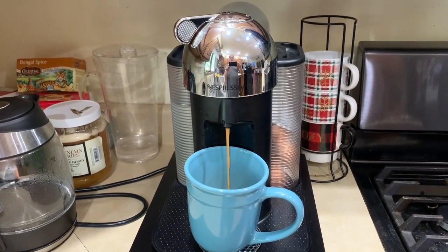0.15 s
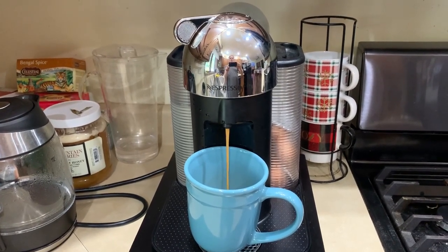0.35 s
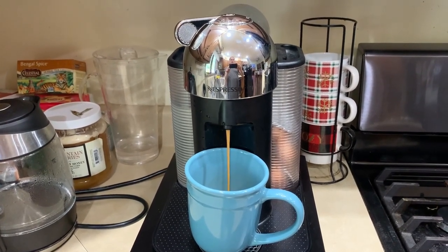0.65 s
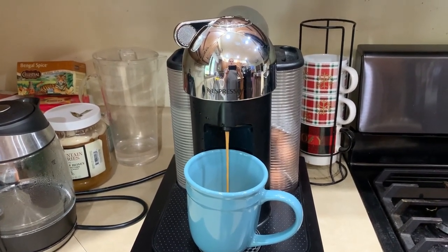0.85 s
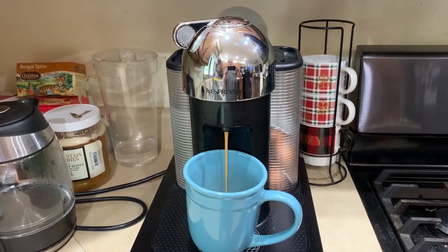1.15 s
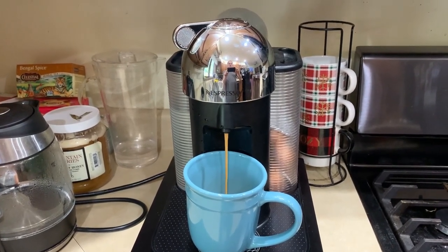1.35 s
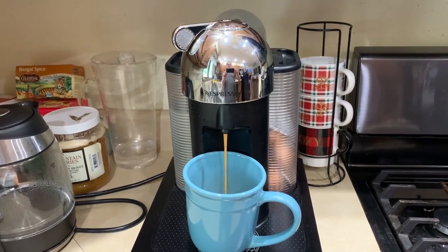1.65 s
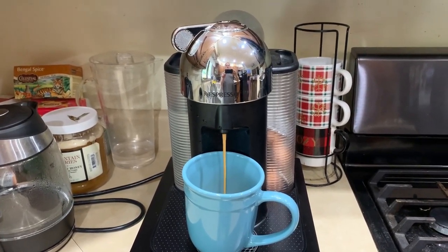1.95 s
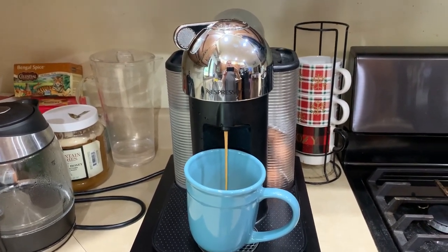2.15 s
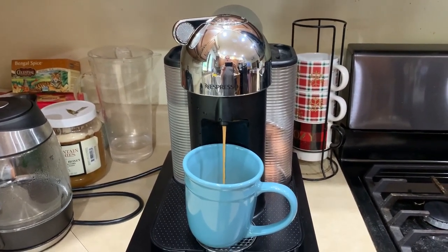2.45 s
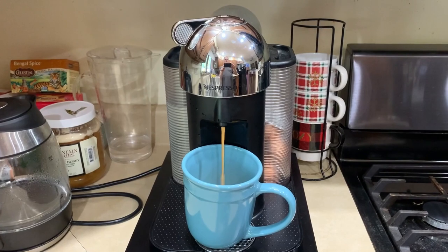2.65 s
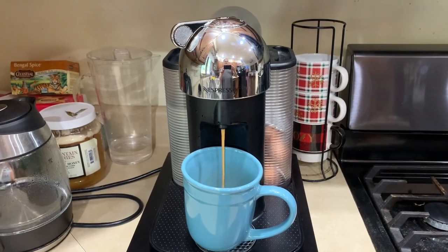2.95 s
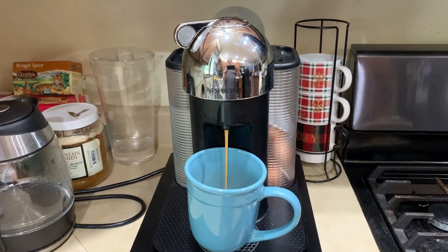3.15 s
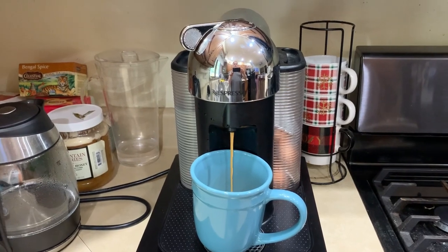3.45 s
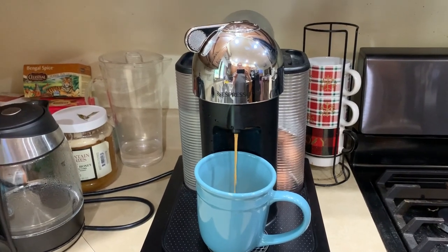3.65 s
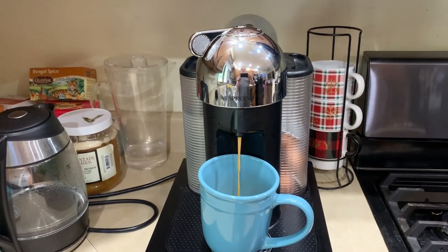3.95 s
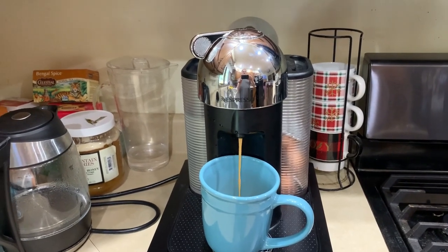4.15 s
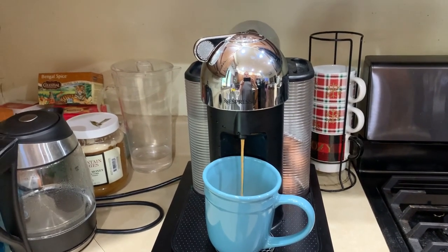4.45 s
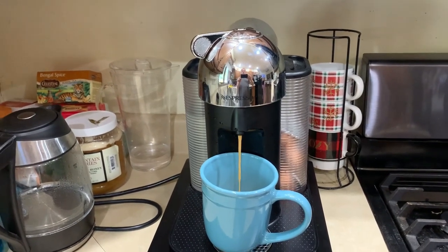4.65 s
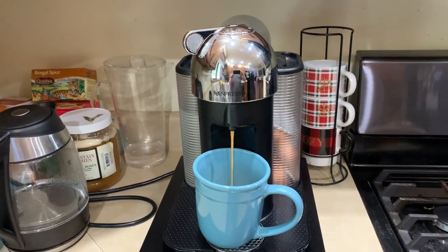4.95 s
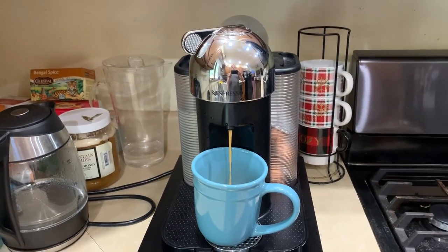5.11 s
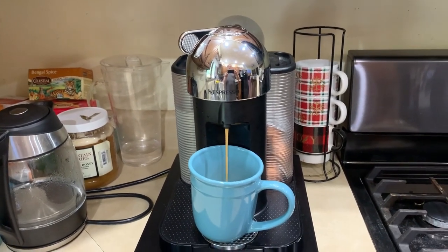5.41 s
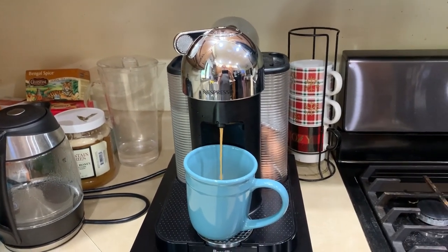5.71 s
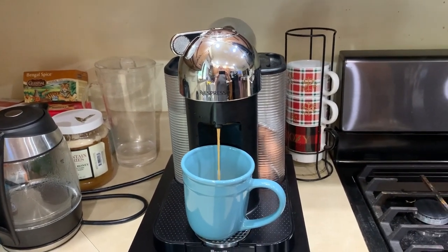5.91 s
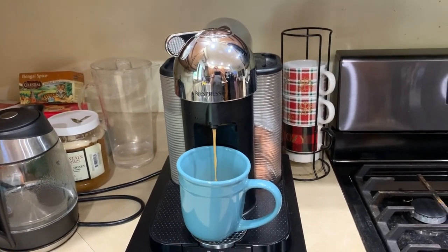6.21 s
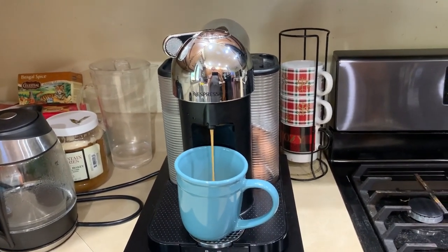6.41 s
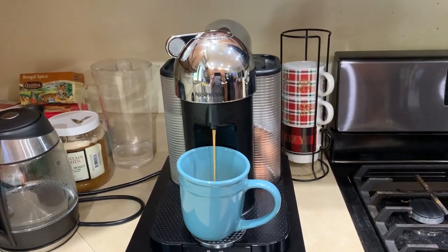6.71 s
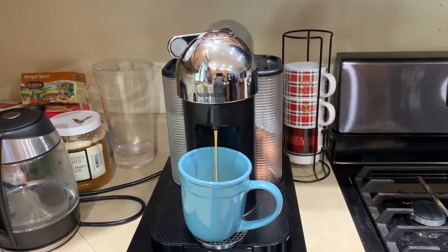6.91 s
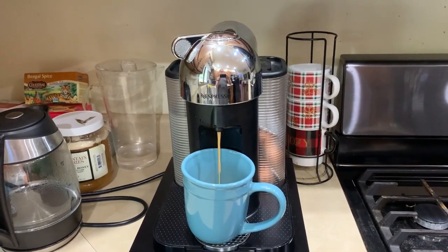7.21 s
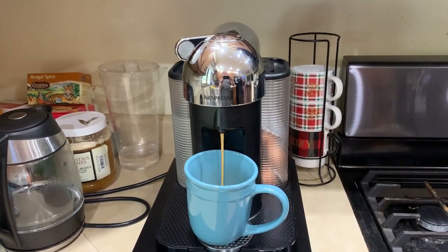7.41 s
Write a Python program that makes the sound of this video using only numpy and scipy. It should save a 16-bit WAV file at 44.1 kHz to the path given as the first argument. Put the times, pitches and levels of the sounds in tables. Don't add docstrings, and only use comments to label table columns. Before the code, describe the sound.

A capsule coffee machine runs throughout on a kitchen counter. A low mains hum from the pump beats slightly against a spinning drone, over rumbling bearings and a bright airy hiss. Small dull knocks, thin rattles and tiny bright cracks come irregularly, several per second, one knock clearly louder every couple of seconds. Heard in stereo by a phone about half a metre away, with short reflections off counter and wall.

```python
import sys
import numpy as np
from scipy import signal
from scipy.fft import rfft, irfft, next_fast_len
from scipy.io import wavfile

SR = 44100
rng = np.random.default_rng(int(sys.argv[2]) if len(sys.argv) > 2 else 0)


def ratio_of_db(decibels):
    return 10 ** (np.asarray(decibels, float) / 20)


def dump_mix(stems):
    frames = np.atleast_2d(stems).T
    limited = np.clip(frames, -1, 1)
    pcm = np.round(limited * 32767).astype(np.int16)
    wavfile.write(sys.argv[1], SR, pcm)


N = 333837

LOOP = 82320
T = np.arange(LOOP) / SR
HZ = np.fft.rfftfreq(LOOP, 1 / SR)
SIDES = np.array([[.5], [-.5]])
MAINS_HZ, SHAFT_HZ = 60, 62.42

# multiple, level_db
COIL_LINES = [(1, -63), (2, -48), (3, -66), (4, -58), (5, -50), (6, -50), (7, -66), (8, -57), (9, -58),
              (10, -64), (11, -61), (15, -67), (18, -66), (25, -72)]
# multiple, level_db
SHAFT_LINES = [(2, -63), (3, -64), (5, -63), (6, -58), (9, -64), (10, -59), (11, -62), (12, -66), (13, -59),
               (14, -65), (16, -62), (17, -69), (24, -69)]
# time_s, level_db
RUBBING = [
    (1.867, -62.5),
    (2.053, -64.5),
    (2.287, -66.5),
    (2.723, -69),
    (2.963, -64),
    (3.343, -71.5),
    (3.733, -62.5),
]
# frequency_hz, level_db_per_hz
RUMBLE_DENSITY = [(30, -91), (48, -82), (250, -78.5), (480, -83), (1000, -82.5), (1400, -88.5),
                  (3500, -86.5), (6500, -89)]
# frequency_hz, left_minus_right_db
RUMBLE_BALANCE = [(200, -5), (2000, -0.5), (4400, -2.5), (6000, -9.5), (7000, 11.5)]
# frequency_hz, left_lead_rad
RUMBLE_PHASE = [(300, 0.57), (1500, 1), (2600, 1.76), (3600, 1.35), (5000, 2.26), (6200, 2.5)]
# frequency_hz, share common to both ports (0-1)
COHERENCE = [(30, .92), (130, .97), (300, .88), (700, .62), (1400, .55), (2600, .4), (4000, .35),
             (6500, .25)]
# frequency_hz, level_db_per_hz
HISS_DENSITY = [(6500, -85.5), (7500, -84), (8500, -80), (9500, -83.5), (11500, -89.5), (12500, -89.5),
                (13500, -94.5), (15600, -95.5)]
# frequency_hz, width_hz, gain_db
MACHINE_MODES = [(337, 170, 5.5), (838, 25, 9), (1050, 22, 1), (1933, 103, 8), (2356, 7.1, 17),
                 (2692, 112, 8.5), (3250, 1470, -3), (3770, 70, 9.5), (4090, 53, 9), (4460, 140, 7.5),
                 (4705, 27, 4.5), (4920, 52, 4), (5260, 19, 9),
                 (5640, 24, 3.6), (5860, 74, 2.3), (7020, 140, 9.4), (7900, 200, 4.8), (9760, 100, 6.1),
              (10180, 250, 4.6), (11200, 260, 3.45), (12850, 150, 5), (13500, 250, 6)]
# frequency_hz, level_db, t60_s
SHELL_MODES = [(675, -6.5, 0.06), (834, -3, 0.04), (925, -1, 0.012), (1072, 6, 0.0094),
               (1232, -7.5, 0.0079), (1580, -2.5, 0.016)]
# frequency_hz, level_db, t60_s
LOOSE_PART_MODES = [(1950, -5.5, 0.023), (2617, -4.5, 0.041), (3327, -4.5, 0.026), (3600, -3.5, 0.024),
                    (4720, 1.5, 0.008), (5250, -8, 0.014)]
# start_s, level_db, pitch_hz
KNOCK_EVENTS = [(2.0865, -31, 818), (2.1565, -30.5, 770), (2.1838, -26.5, 830), (2.2243, -27, 910),
                (2.2515, -36, 675), (2.4165, -32.5, 950), (2.4825, -32, 830), (2.514, -29, 1150),
                (2.543, -32, 950), (2.628, -30, 760), (2.7533, -19, 1000), (2.831, -38, 750),
                (2.898, -32, 860), (3.0002, -26, 810), (3.0485, -31, 840), (3.151, -42.5, 670),
                (3.265, -34.5, 715), (3.616, -37, 810), (3.661, -33, 690), (3.697, -37, 806)]
# start_s, rattle_level_db, pitch_hz, crack_level_db
RATTLE_EVENTS = [(2.033, -40.5, 3380, -53), (2.183, -43, 2700, -34), (2.354, -44, 2700, -52),
                 (2.483, -42, 3600, -50), (2.5144, -30.5, 2000, -26.5), (2.5417, -36.5, 4020, -24),
                 (2.629, -41.5, 3300, -39), (2.7523, -33.5, 2860, -29), (3.0005, -31, 2720, -48),
                 (3.036, -36, 2960, -35), (3.395, -40.5, 4500, -46)]


def curve(table):
    hz, value = np.transpose(table)
    return np.interp(np.log(HZ + 1), np.log(hz), value)


def noise(db, channels=1):
    white = rfft(rng.standard_normal((channels, LOOP)))
    return white * ratio_of_db(db) * np.sqrt(SR / 2)


def walk(rate_hz):
    x = irfft(noise(0)[0] * np.exp(-(HZ / rate_hz) ** 2) * (HZ > 0), LOOP)
    return x / x.std()


def flicker(spectrum, shared_db, own_db, rate_hz):
    octave = np.round(np.log2(HZ + 1))
    swell = walk(0.7)
    out = 0
    for k in range(4, 15):
        band = irfft(spectrum * (octave == k), LOOP)
        out = out + band * ratio_of_db(shared_db * swell + own_db * walk(rate_hz))
    return out


def resonance_db():
    return sum(db / (1 + (2 * (HZ - hz) / width) ** 2) for hz, width, db in MACHINE_MODES)


def kitchen(wet_db, t60, channels):
    echoes = rng.standard_normal((channels, LOOP)) * np.exp(-np.log(1000) * T / t60)
    energy = np.sum(echoes ** 2, axis=1, keepdims=True)
    echoes = rfft(echoes / np.sqrt(energy)) * np.minimum(HZ / 900, 1)
    return (1 + ratio_of_db(wet_db) * echoes) / np.sqrt(1 + ratio_of_db(2 * wet_db))


def head_delay():
    lag_s, turn_rad = .000196, 1.02
    phase = 2 * np.pi * HZ * lag_s - turn_rad
    return np.exp(-1j * SIDES * phase)


def housing_lead():
    return np.exp(1j * SIDES * curve(RUMBLE_PHASE))


def rumble():
    db = curve(RUMBLE_DENSITY + [(8500, -110)]) + resonance_db() - 0.5
    share = np.clip(curve(COHERENCE), 0, 1)
    common = np.sqrt(share) * noise(db) * housing_lead()
    separate = np.sqrt(1 - share) * noise(db, channels=2)
    balance = ratio_of_db(curve(RUMBLE_BALANCE) * SIDES)
    both = (common + separate) * balance * kitchen(-11, t60=0.12, channels=1)
    return flicker(both, shared_db=0.1, own_db=0.8, rate_hz=24.0)


def ring(modes, cycles):
    t = T[:4096]
    rings = []
    for k, (hz, db, t60) in enumerate(modes):
        tone = (-1) ** k * ratio_of_db(db) * np.sin(2 * np.pi * hz * t)
        decay = np.exp(-np.log(1000) * t / t60)
        onset = 1 - np.exp(-(t * hz / cycles) ** 2)
        rings.append(rfft(tone * decay * onset, LOOP))
    return rings


def blow(start_s, db, pan_db):
    return ratio_of_db(db + pan_db * SIDES) * np.exp(-2j * np.pi * HZ * (start_s % (LOOP / SR)))


def strike(start_s, db, pitch_hz, pan_db, modes, rings, focus_db):
    body = 0
    for (hz, _, _), mode in zip(modes, rings):
        body = body + ratio_of_db(-focus_db * abs(np.log2(hz / pitch_hz))) * mode
    return blow(start_s, db, pan_db) * body


def cracks():
    t = T[:256]
    bursts = rng.standard_normal((len(RATTLE_EVENTS), 256)) * np.exp(-t / .0005)
    out = 0
    for (start_s, _, _, db), burst in zip(RATTLE_EVENTS, bursts):
        out = out + blow(start_s, db, pan_db=4) * rfft(burst, LOOP)
    colour_db = curve([(3000, -37), (6000, -13), (8000, 8.5), (11000, -1.5), (15000, 0)])
    return irfft(out * head_delay() * ratio_of_db(colour_db), LOOP)


def rattles():
    rings = ring(LOOSE_PART_MODES, cycles=0.54)
    out = 0
    for start_s, db, pitch_hz, _ in RATTLE_EVENTS:
        out = out + strike(start_s, db, pitch_hz, 0, LOOSE_PART_MODES, rings, focus_db=7.5)
    return irfft(housing_lead() * out, LOOP)


def knocks():
    full_db, slope = -23.5, 0.69
    rings = ring(SHELL_MODES, cycles=.8)
    rebound = ratio_of_db(-11) * blow(.0066, 0, 0) + ratio_of_db(-8) * blow(.0098, 0, 0)
    out = 0
    for start_s, db, pitch_hz in KNOCK_EVENTS:
        hit = strike(start_s, db, pitch_hz, -0.5, SHELL_MODES, rings, focus_db=12.5)
        out = out + hit * (1 + ratio_of_db(slope * (db - full_db)) * rebound)
    return irfft(out * kitchen(-10, t60=0.1, channels=2), LOOP)


def hiss():
    db = curve([(5200, -110)] + HISS_DENSITY) + resonance_db() - 1.5
    spray = head_delay() * noise(db) + noise(db - 11.5, channels=2)
    spray = spray * kitchen(-6.0, t60=0.14, channels=1)
    throb = 1 + 0.054 * np.sin(2 * np.pi * SHAFT_HZ * T)
    return flicker(spray, shared_db=0.86, own_db=-0.45, rate_hz=29.0) * throb


def harmonics(strong, faint_db, count):
    slope_db, scatter_db = -0.4791, 2.5
    pan_db, pan_scatter_db = 1, 4.5
    k = np.arange(1, count + 1)
    level_chance, pan_chance = rng.standard_normal((count, 2)).T
    faint = faint_db + slope_db * k + scatter_db * level_chance
    levels = [dict(strong).get(n, db) for n, db in zip(k, faint)]
    pans = pan_db + pan_scatter_db * np.minimum(k / 10, 1) ** 2 * pan_chance
    return zip(k, levels, pans)


def drone(lines, phase, flutter_db, skew_rad):
    out = 0
    for k, db, pan_db in lines:
        turns = round(k) * phase / (2 * np.pi)
        turns = turns * round(turns[-1]) / turns[-1]
        start = rng.uniform(0, 2 * np.pi) + skew_rad * rng.standard_normal() * SIDES
        level = ratio_of_db(db + pan_db * SIDES + flutter_db * walk(7.7))
        out = out + level * np.sqrt(2) * np.sin(2 * np.pi * turns + start)
    return out


def spinner():
    speed_hz = SHAFT_HZ * (1 + 0.0015 * walk(5.7))
    phase = 2 * np.pi * np.cumsum(speed_hz) / SR
    shaft = drone(harmonics(SHAFT_LINES, -70, count=31), phase, flutter_db=3.0, skew_rad=0.69)
    time_s, db = np.transpose(RUBBING)
    swell = ratio_of_db(1.2 * np.interp(T, time_s, db - db.mean(), period=LOOP / SR))
    shell = irfft(rfft(shaft) * np.exp(-((HZ - 760) / 160) ** 4), LOOP)
    return shaft + (swell - 1) * shell


def pump():
    phase = 2 * np.pi * MAINS_HZ * (T + 1 / SR)
    return drone(harmonics(COIL_LINES, -64.5, count=33), phase, flutter_db=0.56, skew_rad=0.076)


def scene():
    once = rumble() + cracks() + rattles() + knocks() + hiss() + spinner() + pump()
    return np.tile(once, N // LOOP + 1)[:, :N]


def low_pass(x):
    return signal.sosfilt(signal.butter(12, 17020, fs=SR, output="sos"), x)


def record(dry):
    size = next_fast_len(N)
    passed = np.fft.rfftfreq(size, 1 / SR) < 15850
    mix = irfft(rfft(dry, size) * passed, size)[:, :N]
    return low_pass(mix)


dry = scene()
out = record(dry)
dump_mix(out)
```